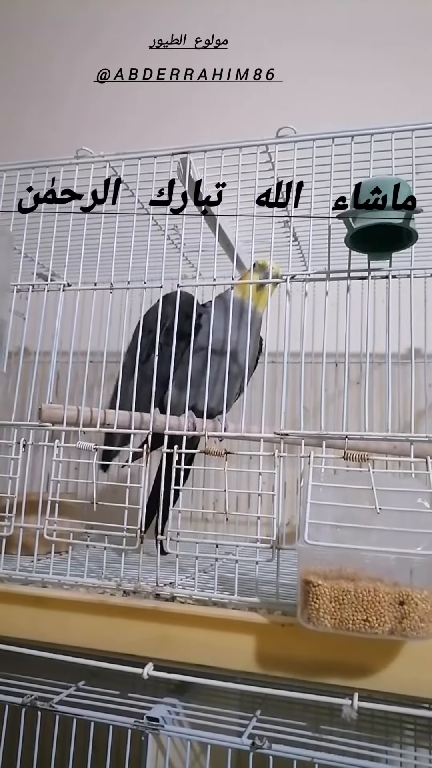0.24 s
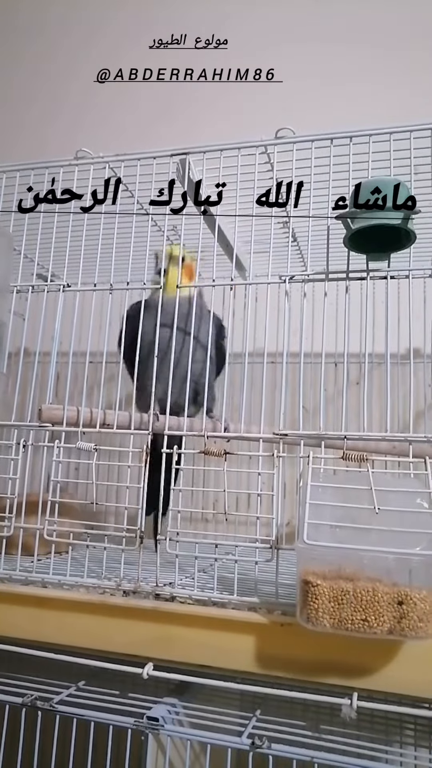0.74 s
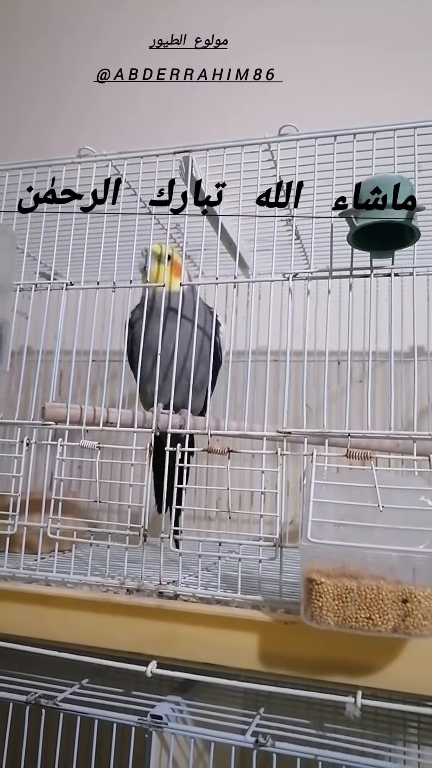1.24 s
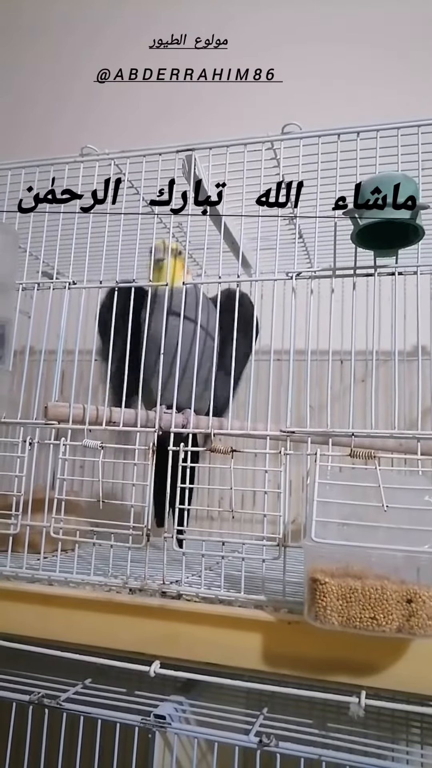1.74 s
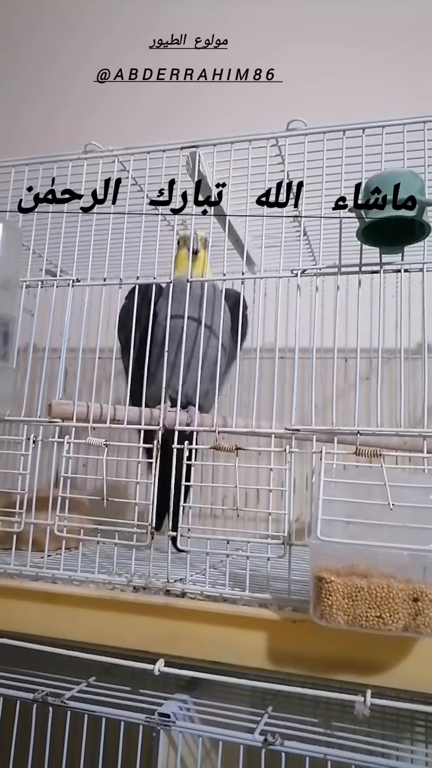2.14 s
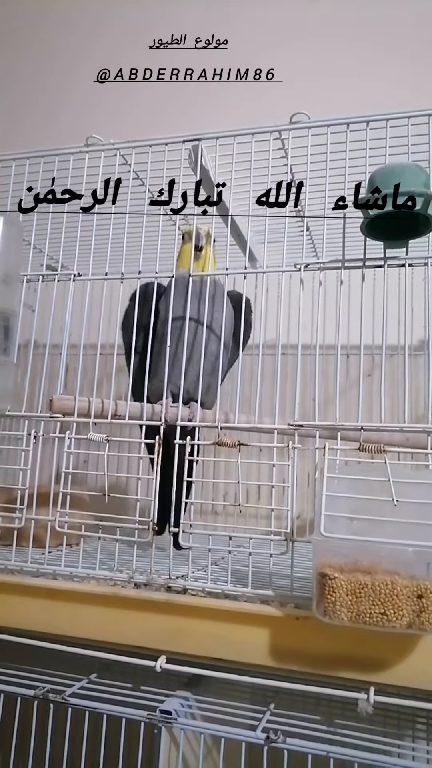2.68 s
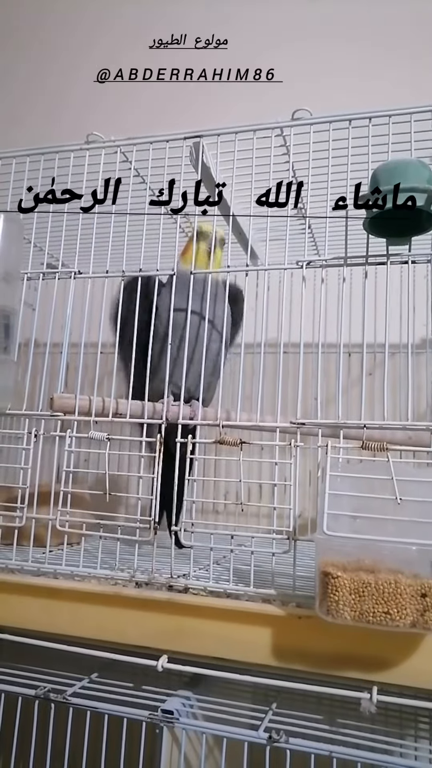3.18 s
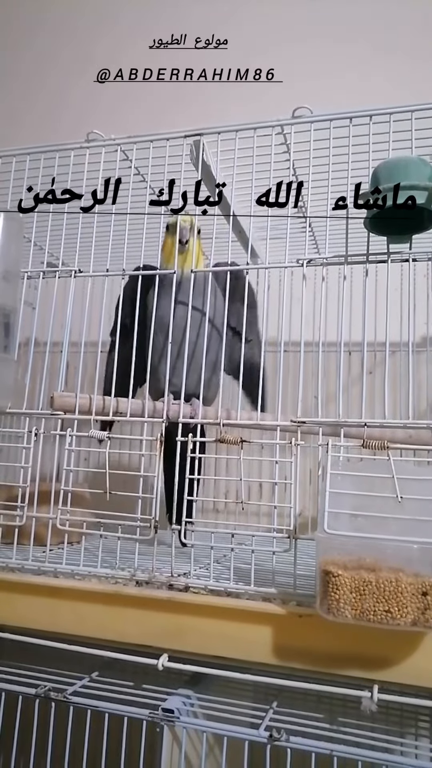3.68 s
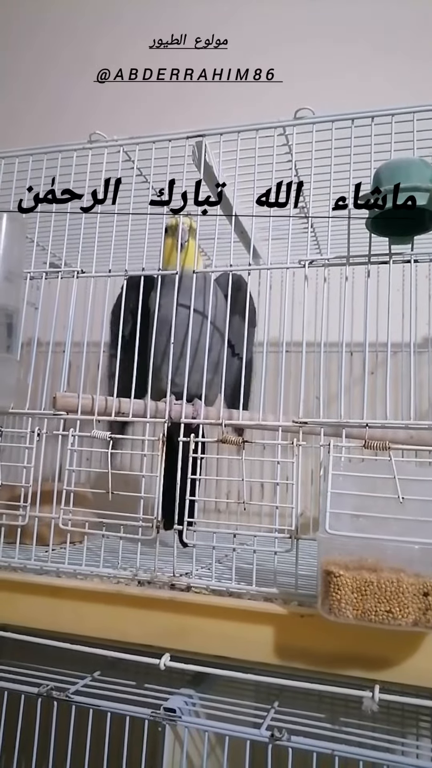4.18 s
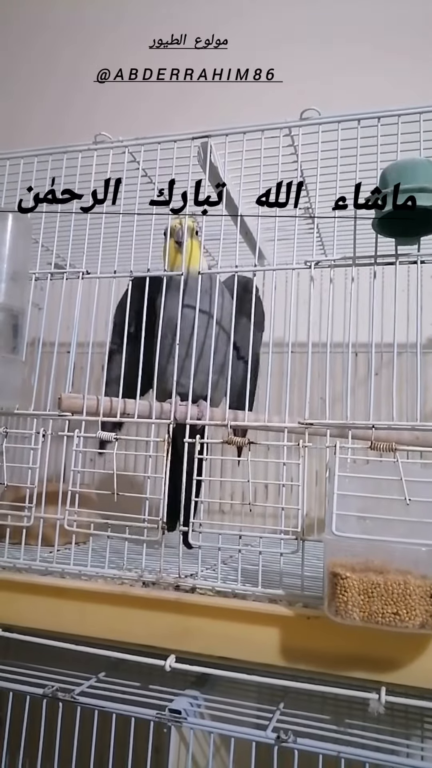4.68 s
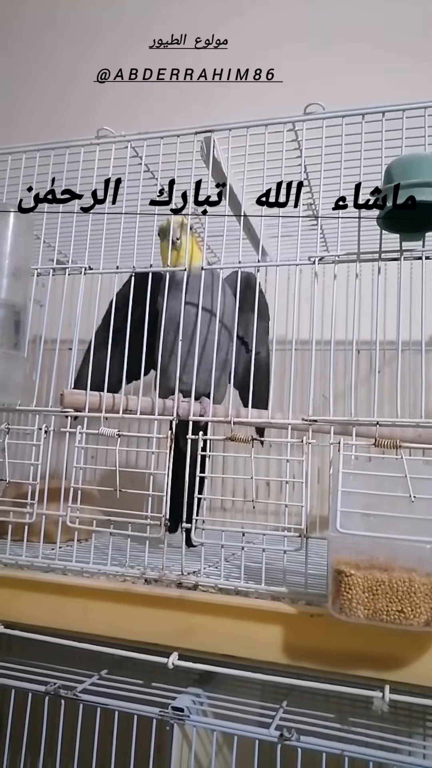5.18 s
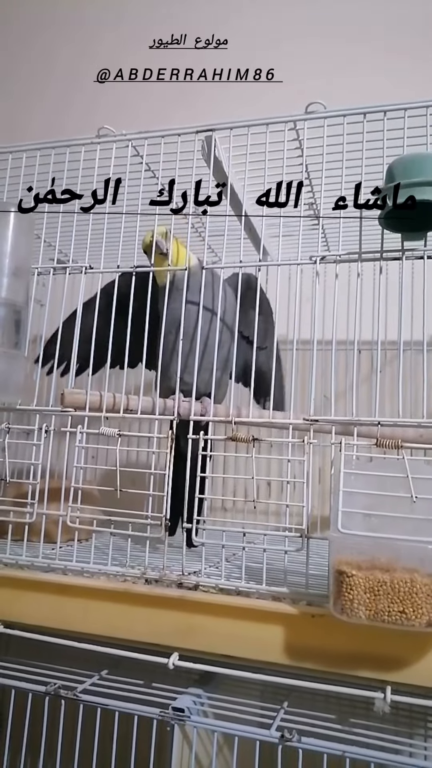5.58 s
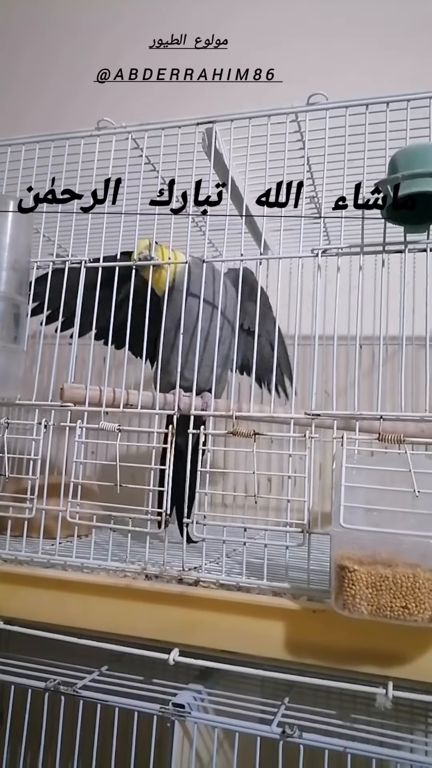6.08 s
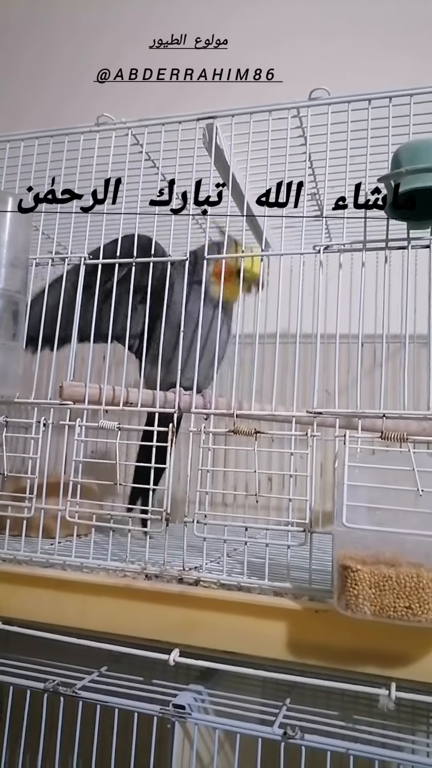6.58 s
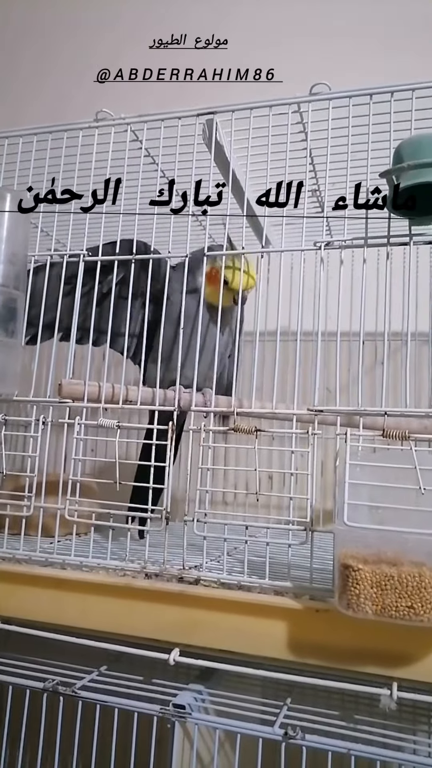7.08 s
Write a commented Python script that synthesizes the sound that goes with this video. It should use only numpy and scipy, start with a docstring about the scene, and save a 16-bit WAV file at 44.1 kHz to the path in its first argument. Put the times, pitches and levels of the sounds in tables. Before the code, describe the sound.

A cockatiel chatters in a wire cage, opening with scratchy rasps and three piercing chirps. It goes on with a run of short slurred whistles, mixed with rough squawks and hoarse hisses. Its wings stir softly and its feet bump the perch now and then. The small hard-walled room rings briefly after each note, picked up by a phone about a metre away.

```python
"""A cockatiel's slurred whistles and piercing chirps alternate with rough squawks and hoarse rasps.
Its syrinx is the source, harmonic in the notes and chaotic in the rasps; throat and beak are the filter.
Behind the voice, wings stir the air and feet bump the perch, exciting the modes of a wire cage.
The small hard-walled room reverberates for half a second after every note, over faint room air.
A phone about a metre away picks up the scene and limits the loudest notes."""
import sys
import numpy as np
from scipy import signal
from scipy.fft import rfft, irfft, next_fast_len
from scipy.io import wavfile
from scipy.ndimage import uniform_filter1d

SR = 44100
rng = np.random.default_rng(int(sys.argv[2]) if len(sys.argv) > 2 else 0)


def transcribe(u):
    """Save the signal u as a 16-bit wav file named by the first command-line argument.

    u: samples, shape (n,) or (channels, n), limited to [-1, 1]; the rate is SR.
    q: integer samples, one column per channel.
    """
    v = np.clip(np.atleast_2d(u).T, -1, 1)
    q = np.round(v * 32767).astype(np.int16)
    wavfile.write(sys.argv[1], SR, q)


N = 323253


def undb(db):
    """Decibels to amplitude gain."""
    return 10 ** (np.asarray(db) / 20)


def unit(x):
    """Normalisation to rms 1."""
    return x / np.sqrt(np.mean(x ** 2) + 1e-20)


def read(points, hz):
    """Interpolation of a (Hz, value) table on a log-frequency axis."""
    f, value = np.transpose(points)
    return np.interp(np.log(np.maximum(hz, 1)), np.log(f), value)


def bins(count):
    """Fourier frequencies of count samples, at least 1 Hz."""
    return np.maximum(np.fft.rfftfreq(count, 1 / SR), 1)


def noise(count, db):
    """Spectral shaping: white noise weighted by db in each bin, rms 1."""
    white = rng.standard_normal(max(count, SR // 2))[:count]
    return unit(irfft(rfft(white) * undb(db), count))


def wobble(count, hz):
    """Low-pass noise: random motion mostly slower than hz, rms 1."""
    return noise(count, -20 * np.log10(1 + (bins(count) / hz) ** 2))


def gate(length, attack, release):
    """Times and envelope of a smooth onset, a hold and an exponential decay; arguments in seconds."""
    t = np.arange(next_fast_len(int((length + 6 * release) * SR), True)) / SR
    onset = np.sin(np.pi / 2 * np.minimum(t / attack, 1)) ** 2
    return t, onset * np.exp(-np.maximum(t - length, 0) / release)


def add(track, start, x):
    """Superposition: mix a sound into a track at start seconds."""
    i = max(int(start * SR), 0)
    track[i:i + len(x)] += x[:max(N - i, 0)]


def diffuse(mid, side):
    """Diffuse-field coherence: the two microphone ports are alike in the bass, unrelated in the treble."""
    count = len(mid)
    coherence = .85 / (1 + (bins(count) / 650) ** 2)
    mid, side = rfft(mid) * np.sqrt(1 + coherence), rfft(side) * np.sqrt(1 - coherence)
    return irfft(np.array([mid + side, mid - side]), count) / np.sqrt(2)


# Spectrum of the room air. Each row: frequency in Hz, relative level in dB.
AIR_SPECTRUM = [(25, -14), (58, 0), (95, -15), (180, -10), (400, -17), (1500, -22), (15000, -45)]


def room_air(level_db=-61):
    """Ambient noise: a faint low rumble arrives from all sides as a diffuse field."""
    count = next_fast_len(N, True)
    spectrum_db = read(AIR_SPECTRUM, bins(count))
    return undb(level_db) * diffuse(noise(count, spectrum_db), noise(count, spectrum_db))[:, :N]


# Reverberation of the room. Each row: frequency in Hz, time to decay by 60 dB in seconds.
REVERB_TIMES = [(250, 0.42), (2000, 0.43), (5000, 0.61), (12000, 0.42)]


def room_tail():
    """Reverberation: dense wall echoes decay exponentially, each octave at its own rate."""
    t = np.arange(SR) / SR
    echoes = rfft(rng.standard_normal(SR))
    octave = np.clip(np.round(np.log2(bins(SR) / 250)), 0, 6)
    tail = np.zeros(SR)
    for k in range(7):
        t60 = read(REVERB_TIMES, 250 * 2 ** k)
        tail += irfft(echoes * (octave == k), SR) * np.exp(-np.log(1000) * t / t60)
    tail *= np.clip((t - .003) / 0.00053, 0, 1)  # the first reflection arrives after 3 ms
    return tail / np.sqrt(np.sum(tail ** 2))


# Shading by the phone's body. Each row: frequency in Hz, level of the left port over the right in dB.
PORT_SHADING = [(500, 6), (1500, -7.5), (1900, -7), (2500, -15), (3400, -22), (5500, -6), (8000, 20.5),
                (12000, -2)]


def ports(x, right_lag_s=0.00017):
    """Path difference and acoustic shadow: direct sound reaches the ports at unequal times and levels."""
    count = next_fast_len(N, True)
    f = bins(count)
    ratio = undb(read(PORT_SHADING, f))
    delay = np.exp(-2j * np.pi * f * right_lag_s)
    pair = np.array([ratio, delay]) * np.sqrt(2 / (1 + ratio ** 2))
    return irfft(rfft(x, count) * pair, count)[:, :N]


# Spectrum of air stirred by a wing. Each row: frequency in Hz, relative level in dB.
WING_SPECTRUM = [(20, -45), (80, -24), (150, 0), (350, -4), (700, -10), (1800, -4), (3000, -6), (4500, -22),
                 (12000, -38)]
# Wing sweeps. Each row: start in seconds, length in seconds, mid-sweep level in dB.
WING_SWEEPS = [(0.081, 0.19, -50), (0.437, 0.24, -44.5), (1.209, 0.35, -44), (2.215, 0.79, -54.5),
               (3.34, 0.33, -47), (5.446, 0.61, -50), (7.044, 0.18, -51)]


def wings():
    """Flow noise: soft uneven rushes of air swell and fade as the wings open and fold."""
    out = np.zeros(N)
    for start, length, db in WING_SWEEPS:
        count = int(length * SR)
        swell = np.sin(np.pi * np.arange(count) / count)
        flutter = undb(2.5 * wobble(count, hz=30))
        rush = noise(count, read(WING_SPECTRUM, bins(count)))
        add(out, start, rush * flutter * swell * undb(db))
    return out


# Modes of perch and cage. Each row: frequency in Hz, bandwidth in Hz, relative peak in dB.
CAGE_MODES = [(202, 67, 29), (300, 120, -1), (457, 12, 15.5), (830, 810, 6), (1145, 140, -14)]
# Feet on the perch. Each row: start in seconds, level in dB, spectral tilt in dB per octave.
PERCH_BUMPS = [(2.27, -52.5, -8), (4.221, -56, -8), (5.033, -45.5, 3.5), (5.919, -37, 3),
               (6.02, -42.5, 3.5), (6.771, -58.5, -13)]


def perch_bumps():
    """Modal resonance: a scuff of the feet rings perch and cage; soft steps ring mainly the lowest mode."""
    out = np.zeros(N)
    lowest_hz = CAGE_MODES[0][0]
    for start, db, tilt_db in PERCH_BUMPS:
        t, envelope = gate(length=0.036, attack=0.0014, release=0.077)
        f = bins(len(t))
        response = sum(undb(mode_db) / np.hypot(1, (f / hz - hz / f) * hz / width) ** 2
                       for hz, width, mode_db in CAGE_MODES)
        spectrum_db = 20 * np.log10(response) + tilt_db * np.log2(np.maximum(f, lowest_hz))
        add(out, start, noise(len(t), spectrum_db) * envelope * undb(db))
    return out


# Source spectrum of a rasp before its tilt. Each row: frequency in Hz, relative level in dB.
RASP_SPECTRUM = [(400, -19.5), (1000, -6), (1500, -4.5), (2400, 8.5), (5300, 1), (7500, -3.5),
                 (9500, -10.5), (11500, -25.5), (15000, -28.5)]
# Hoarse rasps. Each row: start in seconds, length in seconds, level in dB, spectral tilt in dB per
# octave, throat resonance in Hz.
RASP_CALLS = [ (0.183, 0.097, -28.5, 8.5, 5760), (0.298, 0.07, -34, 5.5, 5100),
              (0.448, 0.086, -41, 5.5, 7400), (1.343, 0.21, -41, 13, 4100),
              (1.564, 0.044, -25.5, 8.5, 6270), (1.658, 0.043, -27.5, 6, 5430),
              (1.735, 0.1, -29, 7.5, 5860), (1.883, 0.045, -34, 5, 5400), (2.023, 0.035, -33, 2.5, 8550),
              (2.319, 0.049, -35, 1.5, 5100), (2.83, 0.057, -36.5, 3.5, 9100), (3.181, 0.09, -30, 4, 6100),
              (3.884, 0.13, -35, 6.5, 5060), (4.134, 0.079, -28, 3, 5200), (4.269, 0.19, -33, 5, 6000),
              (4.595, 0.0264, -30.5, -1, 6700), (5.124, 0.039, -30, 3, 5440),
              (5.43, 0.032, -27.5, 7.5, 5130), (5.599, 0.1, -28, 8.5, 6000), (6.165, 0.057, -41, 18, 5300),
              (6.825, 0.068, -33.5, 3, 6100), (7.1, 0.035, -32.5, 4.5, 8300),
              (7.296, 0.034, -30, 7.5, 6000)]


def rasps(throat_peak_db=10.5, half_width_hz=560, wander=0.09, patch_db=6, swell_db=3.5):
    """Chaotic oscillation: the syrinx hisses through a wandering throat resonance and brief side peaks."""
    out = np.zeros(N)
    window = dict(nperseg=256, noverlap=192)
    for start, length, db, tilt_db, throat_hz in RASP_CALLS:
        t, envelope = gate(length, attack=.03, release=.012)
        count = len(t)
        octaves = np.log2(np.maximum(bins(count), RASP_SPECTRUM[0][0]))
        source = noise(count, read(RASP_SPECTRUM, bins(count)) + tilt_db * octaves)
        f, frames, spectra = signal.stft(source, SR, **window)
        centre_hz = throat_hz * (1 + wander * np.interp(frames, t, wobble(count, hz=30)))
        throat_db = throat_peak_db / (1 + ((f[:, None] - centre_hz) / half_width_hz) ** 2)
        # side resonances: random patches, smoothed over frequency and then over time
        patches = uniform_filter1d(rng.standard_normal(spectra.shape), size=3, axis=0)
        patches = unit(uniform_filter1d(patches, size=11, axis=1))
        hiss = signal.istft(spectra * undb(throat_db + patch_db * patches), SR, **window)[1][:count]
        effort_db = swell_db * (np.sin(np.pi * np.minimum(t / length, 1)) - 1)
        flutter_db = 2 * wobble(count, hz=60) + 2.5 * wobble(count, hz=400)
        add(out, start, unit(hiss) * envelope * undb(db + effort_db + flutter_db))
    return out


def syrinx(pitch, beak, overtone_db, rough, harmonics, flicker_db=4):
    """Source and filter: the beak colours a harmonic series; roughness shakes its pitch and amplitude."""
    count = len(pitch)
    jitter = rough ** 1.4 * (.065 * wobble(count, hz=600) + .035 * wobble(count, hz=90))
    hz = pitch * (1 + jitter)
    phase = 2 * np.pi * np.cumsum(hz) / SR
    voice = np.sin(phase)
    for k in range(2, harmonics + 1):
        colour_db = read(beak, k * hz) + flicker_db * wobble(count, hz=35)
        voice += undb(overtone_db + colour_db) * (k * hz < SR / 2) * np.sin(k * phase)
    shimmer = undb(7.3 * rough * wobble(count, hz=207))
    return np.sqrt(2) * voice * shimmer


# Filter of the open beak, for squawks and chirps. Each row: frequency in Hz, overtone gain in dB.
OPEN_BEAK_FILTER = [(3500, -0.5), (4200, 7.5), (5500, 0.5), (6500, -6), (8300, -7.5), (10400, -16.5),
                    (12200, -31), (14500, -30)]
# Squawks. Each row: start in seconds, length in seconds, first and last pitch in Hz, level in dB,
# overtone gain in dB.
SQUAWK_CALLS = [ (0.0, 0.035, 1584, 1540, -38.5, -10.5), (0.451, 0.09, 1620, 2150, -44, -27),
                (2.269, 0.06, 2717, 2450, -47.5, -4), (2.71, .036, 3860, 3470, -33, -13),
                (2.811, 0.035, 4400, 3620, -46, 9.5), (3.064, 0.025, 4490, 4260, -32, -8),
                (3.104, 0.063, 3535, 2800, -32, -11), (3.45, 0.028, 2170, 1768, -32.5, -17),
                (3.63, 0.054, 1615, 2440, -44, -11.5), (4.213, 0.068, 2326, 1986, -29, -39),
                (4.359, 0.046, 5760, 3830, -36.5, -19), (4.514, 0.17, 3564, 3080, -40, -22),
                (4.851, 0.084, 3884, 4660, -37, 2.5), (5.139, 0.13, 3370, 2940, -34, -46),
                (5.34, 0.071, 3053, 4380, -39.5, -2.5), (6.175, 0.053, 2093, 3310, -39, -16),
                (6.928, 0.072, 3800, 3680, -38.5, -15)]


def squawks(warble_depth=0.0563):
    """Frequency modulation: an uneven warble rides on a glide so rough that its pitch scatters."""
    out = np.zeros(N)
    for start, length, first_hz, last_hz, db, overtone_db in SQUAWK_CALLS:
        t, envelope = gate(length, attack=.012, release=.004)
        warble_hz = 85 + 45 * wobble(len(t), hz=60)
        warble = np.sin(2 * np.pi * np.cumsum(warble_hz) / SR)
        pitch = np.interp(t, [0, length], [first_hz, last_hz]) * (1 + warble_depth * warble)
        voice = syrinx(pitch, OPEN_BEAK_FILTER, overtone_db, rough=0.468, harmonics=3)
        add(out, start, voice * envelope * undb(db))
    return out


# Open-beaked chirps. Each row: start in seconds, length in seconds, first and top pitch in Hz, time to
# the top in seconds, level in dB, overtone gain in dB, roughness from 0 to 1.
CHIRP_CALLS = [(0.682, 0.09, 1780, 2116, 0.072, -31, -3.5, 0.05),
               (0.856, 0.088, 1974, 2166, 0.093, -29.5, -2.5, 0.12),
               (1.064, 0.1, 1796, 2042, 0.064, -31, -6.5, 0.14),
               (6.432, .041, 3003, 3240, 0.0387, -34.5, -0.5, 0.43),
               (7.194, 0.041, 2523, 2684, 0.037, -38, 5.5, 0.48)]


def chirps(growth_db=3):
    """Parabolic frequency sweep: a chirp arches upward and grows a little, piercing with overtones."""
    out = np.zeros(N)
    for start, length, first_hz, top_hz, top_s, db, overtone_db, rough in CHIRP_CALLS:
        t, envelope = gate(length, attack=.004, release=.0015)
        pitch = top_hz - (top_hz - first_hz) * (1 - t / top_s) ** 2
        effort_db = growth_db * (t / length - .5)
        voice = syrinx(pitch, OPEN_BEAK_FILTER, overtone_db, rough, harmonics=7)
        add(out, start, voice * envelope * undb(db + effort_db))
    return out


# Filter of the nearly shut beak. Each row: frequency in Hz, overtone gain in dB.
SHUT_BEAK_FILTER = [(2900, 15.5), (3150, 5), (3700, -15.5), (5000, -2), (6100, -7), (7200, -13.5),
                    (9800, -27.5), (11700, -14.5), (13300, -17.5), (14700, -17.5)]
# Whistles. Each row: start in seconds, length in seconds, first and second pitch in Hz, times of the
# slur and of the loudness crest as shares of the length, final drop as a share of the pitch, crest
# level in dB, overtone gain in dB.
WHISTLE_NOTES = [ (0.038, 0.07, 1302, 1450, 0.34, 0.5, 0.079, -31.5, -13),
                 (1.359, 0.099, 1810, 1649, 0.35, 0.95, 0.036, -25, -16.5),
                 (1.836, 0.1, 1906, 2010, 0.39, 0.66, 0.082, -20.5, -39),
                 (2.079, 0.088, 3670, 3444, 0.5, 0.63, 0.064, -24, -11),
                 (2.379, 0.04, 1880, 1754, 0.47, 1, 0.033, -24, -17),
                 (2.418, 0.093, 1700, 1872, 0.44, 0.74, 0, -15.5, -19.5),
                 (2.977, 0.14, 1844, 1981, 0.46, 0.53, 0.034, -16.5, -20),
                 (3.472, 0.13, 1581, 1470, 0.63, 0.54, 0.069, -29.5, -23),
                 (3.664, 0.13, 2610, 3062, 0.38, 1, 0, -16.5, -20),
                 (4.01, 0.1, 1671, 1796, 0.48, 0.78, 0.053, -21, -16.5),
                 (4.438, 0.11, 1940, 2134, 0.27, 0.44, 0.028, -21, -21.5),
                 (4.608, 0.13, 2133, 2540, 0.6, 0.87, 0.0031, -19, -17.5),
                 (4.925, .1, 1898, 1780, .82, 0.84, 0.034, -19, -19),
                 (5.141, 0.13, 2072, 2325, 0.41, 0.56, 0.062, -22, -20.5),
                 (5.414, 0.13, 2067, 2049, 0.42, 0.53, 0.038, -22.5, -18.5),
                 (5.772, 0.11, 1854, 1892, 0.48, 0.73, 0.051, -24.5, -17.5),
                 (6.576, 0.094, 3396, 3344, 0.54, 0.54, 0.28, -17.5, -17.5),
                 (6.879, 0.13, 1875, 2101, 0.3, 0.51, 0.024, -21.5, -11)]


def whistles(settle_s=0.01106, drop_s=.005, clear_s=0.048, swell_db=11.5):
    """Glissando: a tone settles, slurs to a second pitch, swells as it clears and may flick downward."""
    out = np.zeros(N)
    slur_width, crest_width, latest_crest = 0.1666, .42, .88  # shares of the length
    for start, length, first_hz, second_hz, slur_at, crest_at, drop, db, overtone_db in WHISTLE_NOTES:
        t, envelope = gate(length, attack=.016, release=.003)
        slur = (1 + np.tanh((t / length - slur_at) / slur_width)) / 2
        sharp_onset = 1 + 0.0401 * np.exp(-t / settle_s)
        waver = 1 + 0.0084 * wobble(len(t), hz=70)
        flick = 1 - drop * np.exp(np.minimum(t - length, 0) / drop_s)
        pitch = (first_hz + (second_hz - first_hz) * slur) * sharp_onset * waver * flick
        crest = np.exp(-((t / length - min(crest_at, latest_crest)) / crest_width) ** 2)
        rough = 0.39 * np.exp(-t / clear_s)
        voice = syrinx(pitch, SHUT_BEAK_FILTER, overtone_db, rough, harmonics=9)
        add(out, start, voice * envelope * undb(db + swell_db * (crest - 1)))
    return out


def scene(room_db=3, beam_hz=3800, chirp_spill_db=-7):
    """Superposition of direct and reverberant fields: bird and cage sound over faint room air."""
    air = room_air()
    walls = diffuse(room_tail(), room_tail())
    whistled, chirped = whistles(), chirps()
    noises = squawks() + rasps() + perch_bumps() + wings()
    # directivity: the beak beams forward, so the walls get duller whistles and weaker chirps
    dulled = signal.lfilter(*signal.butter(1, beam_hz, fs=SR), whistled)
    to_walls = dulled + undb(chirp_spill_db) * chirped + noises
    reverberation = signal.fftconvolve(to_walls[None], walls, axes=1)[:, :N]
    return ports(whistled + chirped + noises) + undb(room_db) * reverberation + air


def record(dry, ceiling_db=-15.5, recovery_db_per_s=30.5, top_hz=15600):
    """Limiting: the phone's gain drops at once on loud notes and creeps back; a low-pass cuts the top."""
    power = uniform_filter1d(np.mean(dry ** 2, axis=0), size=SR // 100)
    excess_db = np.maximum(10 * np.log10(np.abs(power) + 1e-12) - ceiling_db, 0)
    recovery_db = recovery_db_per_s * np.arange(N) / SR
    cut_db = np.maximum.accumulate(excess_db + recovery_db) - recovery_db
    low_pass = signal.ellip(10, .2, 80, top_hz, fs=SR, output="sos")
    return signal.sosfilt(low_pass, dry * undb(-cut_db))


dry = scene()
out = record(dry)
transcribe(out)
```